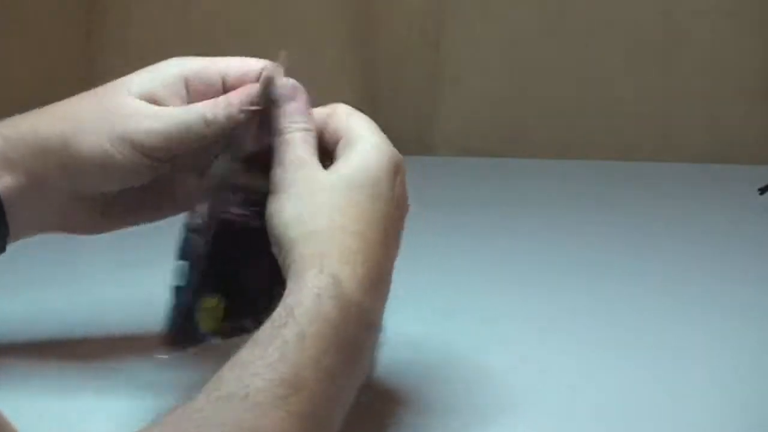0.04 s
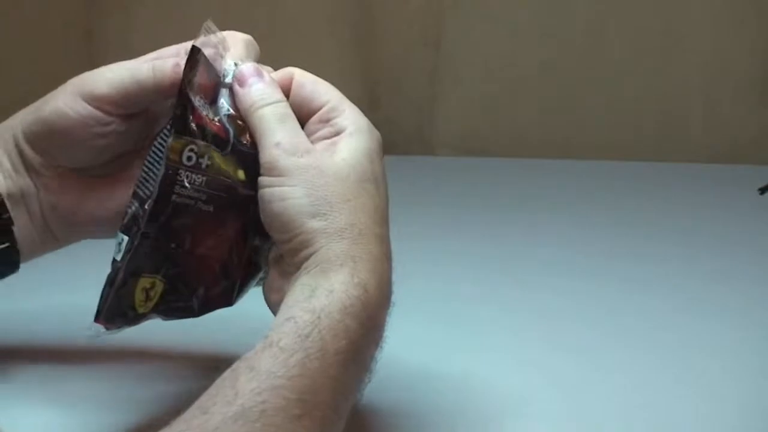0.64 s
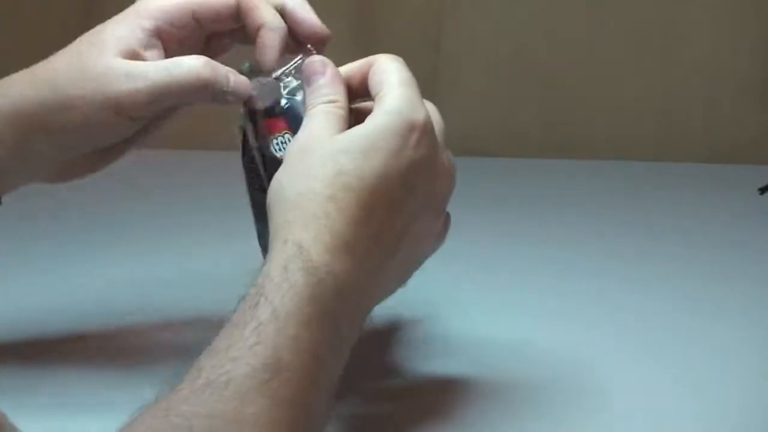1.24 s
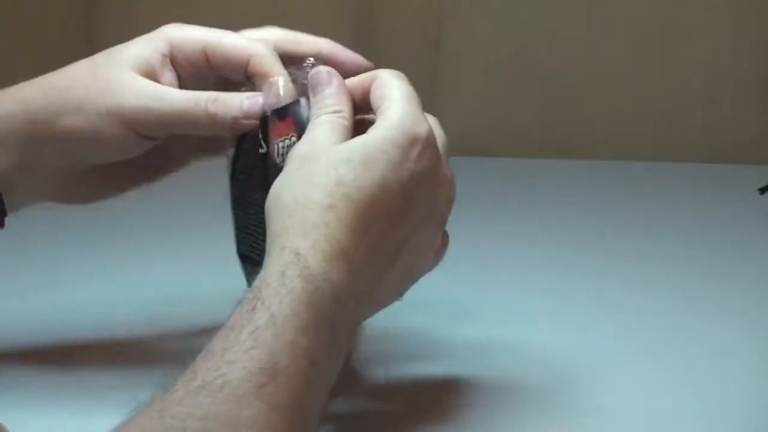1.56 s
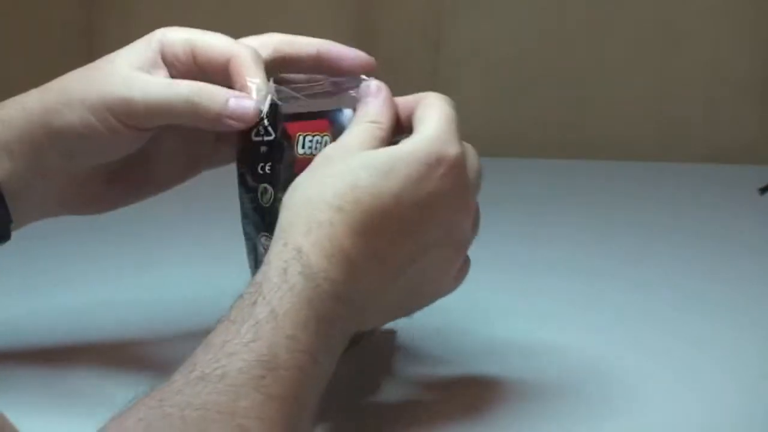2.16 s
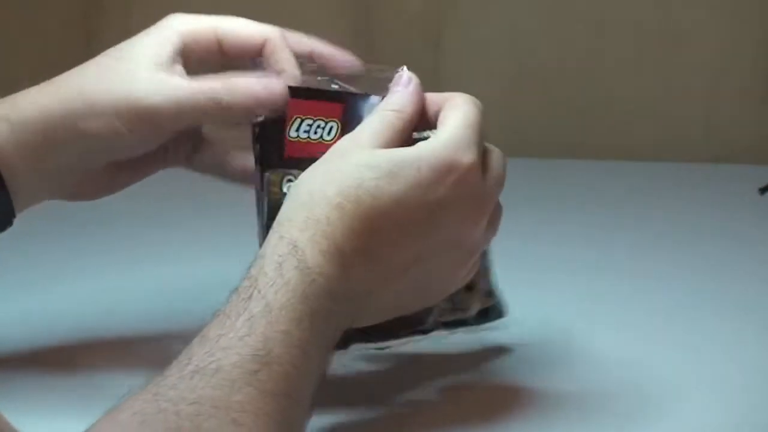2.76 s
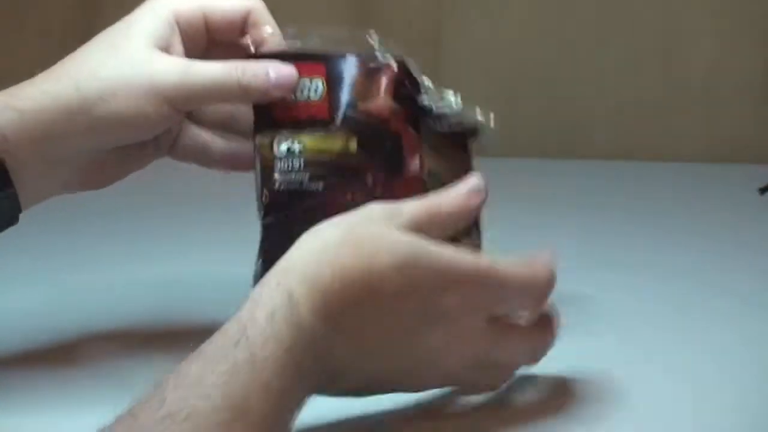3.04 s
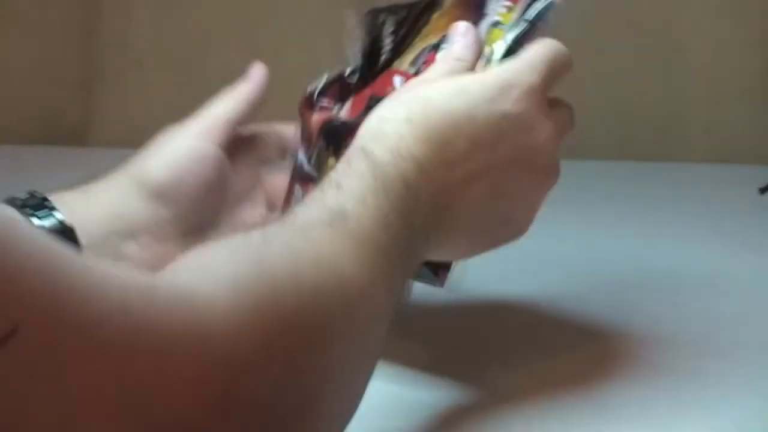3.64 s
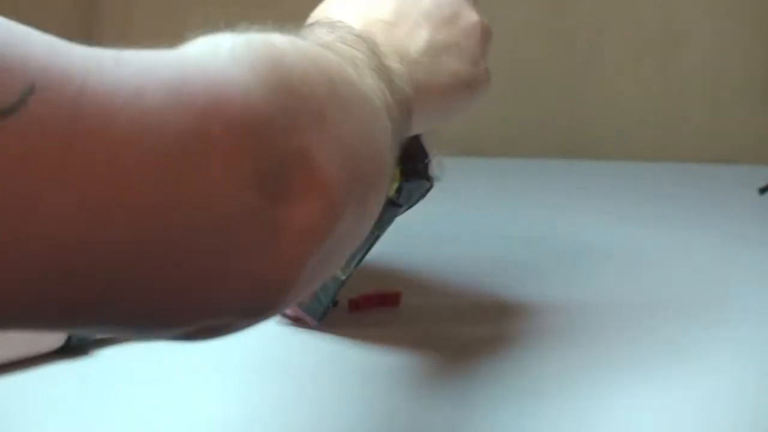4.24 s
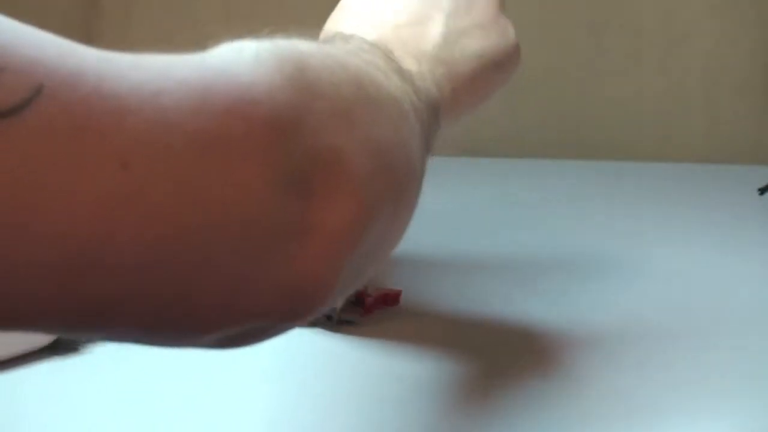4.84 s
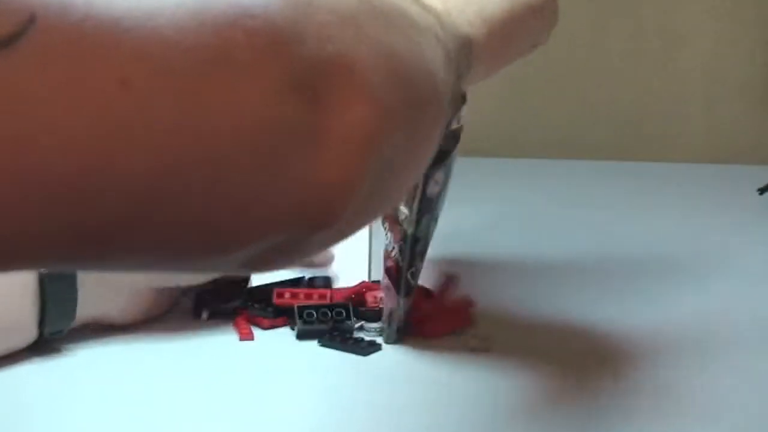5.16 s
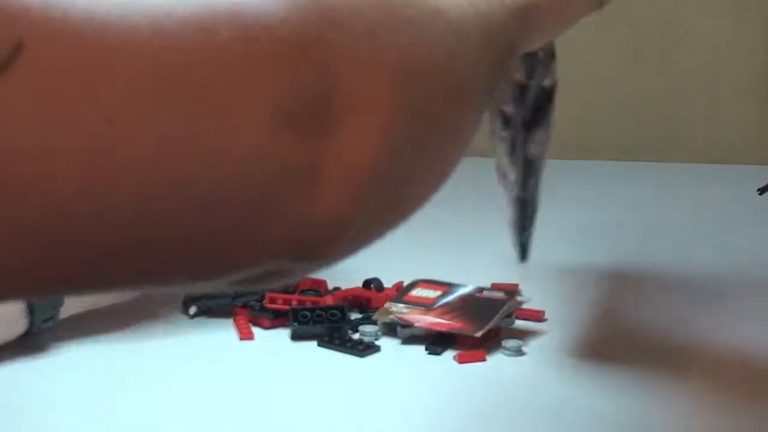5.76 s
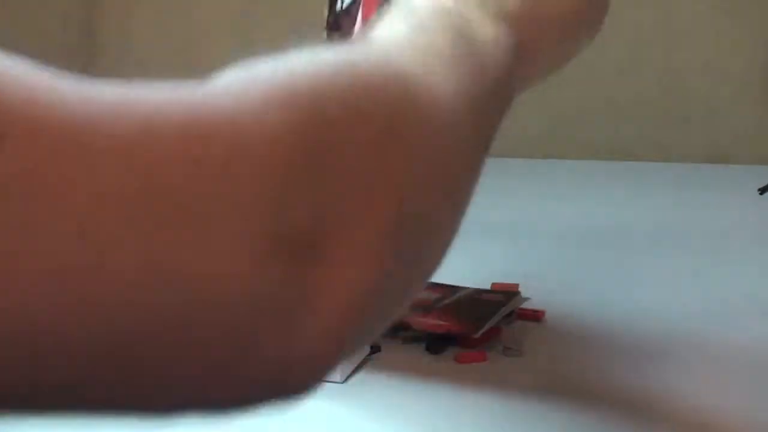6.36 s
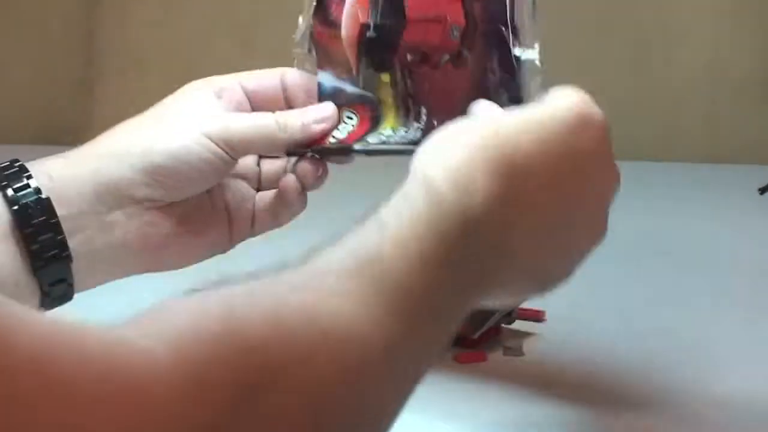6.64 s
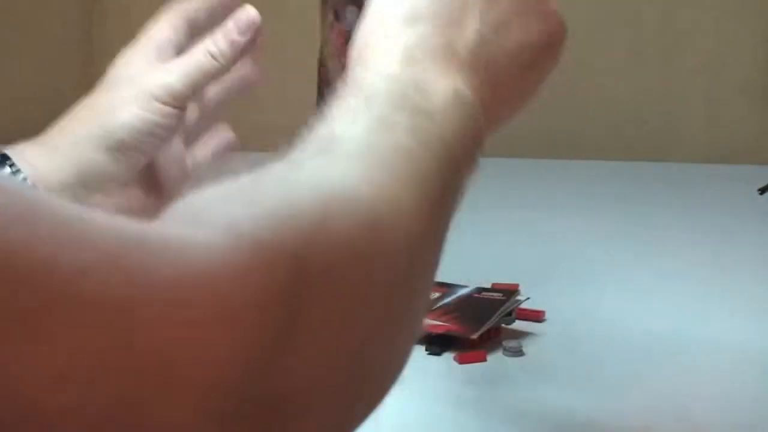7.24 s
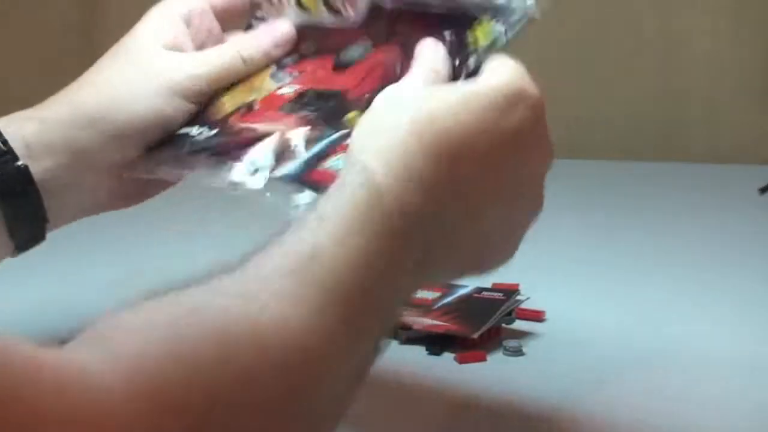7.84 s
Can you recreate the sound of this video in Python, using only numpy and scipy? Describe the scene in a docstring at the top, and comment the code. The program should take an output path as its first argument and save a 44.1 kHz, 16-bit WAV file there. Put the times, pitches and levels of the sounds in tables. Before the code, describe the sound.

Close to the microphone in a small room, fingers work open a stiff plastic packet, making sharp crackles, rustles and a few dull taps. Little plastic bricks then spill onto a tabletop in uneven surges, clacking and bouncing. A light booklet lands with a few quick slaps, and the emptied packet crinkles again in short bursts over faint room air.

```python
"""A table in a small room, with a closely spaced microphone pair near the hands.
A stiff plastic bag is torn open and crinkled; every crease that buckles is one tiny snap.
Small plastic bricks slide out and clatter on the table top, a folded booklet drops after them,
and the empty bag is shaken and crumpled. Behind it lie room air and a faint, passing hum."""
import sys
import numpy as np
from scipy import signal
from scipy.fft import rfft, irfft, next_fast_len
from scipy.io import wavfile
from scipy.ndimage import uniform_filter1d

SR = 44100
rng = np.random.default_rng(int(sys.argv[2]) if len(sys.argv) > 2 else 0)


def transcribe(u):
    """Save the signal u as a 16-bit wav file named by the first command-line argument.

    u: samples, shape (n,) or (channels, n), limited to [-1, 1]; the rate is SR.
    q: integer samples, one column per channel.
    """
    v = np.clip(np.atleast_2d(u).T, -1, 1)
    q = np.round(v * 32767).astype(np.int16)
    wavfile.write(sys.argv[1], SR, q)


N = 348831
TIME = np.arange(N) / SR

# tone colour of the plastic film: frequency_hz, level_db
FILM_COLOUR = [(50, -53), (140, -14), (280, -5.5), (430, -7.5), (620, 0.5), (1000, -2.5), (1700, 0.5),
               (2800, -0.5), (4200, 1.5), (7500, 2), (10000, -2.5), (12500, -2.5), (14500, -15.5),
               (16000, -23)]
# ringing of the table top: pitch_hz, level_db, t60_s
TABLE_TOP_MODES = [(616, -6.5, 0.34), (1435, -0.5, 0.052), (2086, 1.5, 0.15), (2216, 2, 0.15),
                   (2580, -0.5, 0.043)]
# low ringing of the whole table: pitch_hz, level_db, t60_s
TABLE_BODY_MODES = [(153, -6.5, 0.42), (289.6, -12, 0.19), (393.3, -11, 0.22)]


def bag(rustle_db=-4, snap_db=4, chain_gain_db=2, crunch_db=-11, resting_db=-58):
    """Creases buckle one by one under the fingers, in short chains, or in whole avalanches."""
    # the fingers take hold of the bag and work it: start_s, length_s, level_db
    grips = [(0, 0.089, -25.5), (.18, 0.29, -28.5), (.53, 0.12, -33.5), (.70, 0.26, -30.5),
             (.915, 0.11, -28), (1.09, 0.24, -34), (1.39, 0.34, -33), (1.8, 0.073, -44),
             (1.875, 0.32, -36.5), (2.255, 0.07, -43.5), (2.4, 0.17, -40), (2.695, 0.016, -36),
             (2.83, 0.099, -36.5), (2.925, 0.25, -28), (3.33, 0.056, -25.5), (3.525, .04, -37),
             (3.572, 0.013, -30), (3.74, 0.14, -34), (3.925, 0.16, -29.5), (5.945, .11, -43.5),
             (6.3, 0.33, -45.5), (6.6, 0.11, -30.5), (6.74, 0.22, -34), (7.27, 0.12, -38),
             (7.38, 0.076, -28), (7.54, 0.17, -33), (7.845, 0.069, -29)]
    # slack film sounds deeper: time_s, low_lift_db
    slack = [(0, 1.5), (1.9, 5.5), (2.55, 10.5), (2.72, 4), (4.0, 8), (6.3, 19.5), (6.45, 4.5)]
    # loud creases that set off a chain of smaller ones: start_s, crack_db, chain_db, chain_low_lift_db
    snaps = [(0.017, -8, -20, 0.5), (0.1297, -9, -35, 10), (0.18, -12, -38, 3), (0.21, -1.5, -22, 2),
             (0.259, -6, -19.5, 1.5), (0.414, -15, -41, -9), (0.540, -6, -20, -12), (0.841, -11, -25, -8),
             (0.876, -6, -28.5, 8), (0.956, -4, -20.5, -1), (1.0674, 1.5, -41, -12), (1.2506, -4.5, -29, 2),
             (1.319, -10.5, -30.5, 11), (1.3839, -13, -29, -13), (1.446, -12, -34, -15),
             (1.548, -15, -25, -15), (1.591, -10, -22, -16), (1.7974, -12.5, -36, 15.5),
             (1.9374, -10.5, -39, -1), (2.068, -5.5, -31, 10), (2.102, -8, -32, 10),
             (2.148, -22, -36, 16.5), (2.403, -12.5, -31, 10.5), (2.5606, -9.5, -35, 16.5),
             (2.6687, -12, -26, -23), (3.178, -8, -20.5, 5.5), (3.477, -8.5, -23.5, -17),
             (3.626, -8.5, -27.5, 0), (3.819, -16, -18, -12), (3.9126, -16, -24, -15),
             (3.945, -5, -22.5, 9.5), (6.1811, -13.5, -34.5, 13), (6.52, -10.5, -29, -12),
             (6.758, -6, -21, -14), (7.0959, -22, -26.5, -15), (7.359, -6.5, -24.5, -2),
             (7.5644, -11.5, -39.5, -14)]
    # whole folds collapsing: start_s, level_db, length_s, low_lift_db
    crunches = [(0.059, -13.5, 0.02, 3), (0.734, -9.5, 0.058, 2.5), (1.668, -16, 0.057, 4),
                (1.977, -14.5, 0.026, -24), (2.932, -17, 0.057, 3), (3.32, -8.5, 0.047, 2),
                (3.948, -15.5, 0.034, 2.5), (6.409, -16, 0.07, 2.5), (6.5772, -6.5, 0.062, -2.5),
                (6.892, -14.5, 0.047, -4.5), (7.416, -7.5, 0.06, -2), (7.687, -7, 0.051, 2.5)]
    effort = swells(grips, attack_s=0.0014, sag_db_per_s=6.5, release_db_per_s=250) + amp(resting_db)
    creases = crackle(per_s=2000, spread_db=4.9, fade_s=0.0008)
    rustle = effort * flurries(per_s=29, lift_db=11, fade_s=0.0046) * creases
    film = amp(rustle_db) * deepened(rustle, np.interp(TIME, *np.transpose(slack)))
    chain = crackle(per_s=3500, spread_db=3.8, fade_s=0.0005)
    after = np.arange(SR // 5)
    t = after / SR
    spreading = np.minimum(t / 0.0055, 1) * np.exp(-t / 0.0086)  # a chain takes a moment to get going
    for s, crack_db, chain_db, low_db in snaps:
        crack = unit(deepened(chatter(fade_s=0.00032), lift_db=-6, hz=4560))
        burst = chain.take(round(s * SR) + after, mode="wrap") * spreading
        add(film, s, amp(crack_db + snap_db) * crack)
        add(film, s, amp(chain_db + chain_gain_db) * deepened(burst, low_db))
    avalanche = crackle(per_s=7000, spread_db=2, fade_s=0.00013)
    for s, db, length_s, low_db in crunches:
        progress = t / length_s  # the fold gives way quickly, then runs out of creases
        collapse = np.minimum(progress / 0.28, 1) * np.exp(-progress ** 3)
        burst = avalanche.take(round(s * SR) + after, mode="wrap") * collapse
        add(film, s, amp(db + crunch_db) * deepened(burst, low_db))
    return through(panels(film), unit(colour(FILM_COLOUR)))


def flurries(per_s, lift_db, fade_s):
    """Gain of mean power 1 that jumps at random moments, as small creases give way together."""
    starts = rng.random(N) < per_s / SR
    extra_power = amp(lift_db) ** 2 * np.exp(-2 * TIME[:SR // 5] / fade_s)
    return evened(np.sqrt(1 + abs(through(1. * starts, extra_power))))


def panels(film, patch_db=1.2, bins=7, frames=10):
    """As the bag changes shape, its taut panels resonate at ever new pitches."""
    spectra = signal.stft(film, nperseg=256)[2]
    patches = uniform_filter1d(rng.standard_normal(spectra.shape), bins, axis=0)
    patches = evened(uniform_filter1d(patches, frames, axis=1))
    return signal.istft(spectra * evened(amp(patch_db * patches)))[1][:N]


def bricks(clatter_db=-4, rub_db=-0.5, jingle_db=-7, landing_db=9, tick_db=6, thud_db=-13.5, count=10):
    """Each contact clacks on the table, ticks, and rings a brick; bricks differ in size and landing spot."""
    # single bricks landing: start_s, level_db, tick_relative_db, rattle_s, pitch_hz
    landings = [(4.052, -20, 18, 0.029, 2680), (4.14, -7.5, 3, 0.0072, 2500), (4.187, 0, -5, 0.007, 2100),
                (4.2327, -1.5, -5, 0.011, 1470), (4.2775, -2.5, 2, 0.017, 2370),
                (4.295, -5, -3, 0.0054, 2540), (4.3144, -0.5, -5, 0.01, 2330),
                (4.512, -10, 10.5, 0.017, 1450), (4.5935, 2.5, -12, 0.003, 2350),
                (4.5985, 5, -9, .004, 2440), (4.6987, -9.5, -14, 0.0017, 2370), (4.739, -2, 0, 0.012, 2280),
                (4.797, -1.5, -4, 0.03, 2460), (4.9297, -17, 11.5, 0.00096, 2300),
                (5.011, 0, -15, 0.0096, 2210), (5.038, -1, -5, 0.0055, 2400),
                (5.0988, -2.5, -4, 0.0052, 2170), (5.132, -5, 2, 0.0059, 2160),
                (5.1786, -2, 1, 0.0076, 2280), (5.1916, -2.5, 7.5, 0.0105, 2700),
                (5.225, -4, 4, 0.0042, 2170), (5.2509, 0.5, -6, 0.0048, 2190), (5.258, -2, 2, 0.003, 2600),
                (5.3682, -14, 0, 0.0048, 2200), (5.456, -10, 10.5, 0.004, 2080),
                (5.5151, -13, 5.5, 0.0041, 2220), (5.5681, -16, 9.5, 0.0048, 2200),
                (5.589, -19, 12.5, 0.0049, 2200), (5.625, -8.5, 8.5, 0.0058, 2130),
                (5.644, -7.5, 3.5, 0.0045, 2120), (5.716, -18, 3.5, 0.0042, 2090)]
    # ringing of a brick: pitch_hz, level_db, t60_s
    brick_modes = [(4780, -3, 0.036), (6420, 8.5, 0.033), (8380, 14.5, 0.038), (11740, 12, 0.027),
                   (13300, 2, .05)]
    # tone colour of a brick striking the table: frequency_hz, level_db
    clack_colour = [(80, -49), (220, -23), (700, -16), (1750, -8), (2250, 0.5), (2600, -2.5), (3000, -6),
                    (4000, -9.5), (16000, -70)]
    # tone colour of the sharp ticks: frequency_hz, level_db
    tick_colour = [(40, -58), (150, -4.5), (1000, 4.5), (3500, 1), (6500, 3), (8500, 0), (9800, -5),
                   (12000, -4), (14500, -26), (16000, -40)]
    impact = np.zeros(len(ring(TABLE_TOP_MODES)))
    add(impact, 0, unit(colour(clack_colour)))
    sizes = np.linspace(-1, 1, count)
    clacks = [unit(impact + amp(-4) * ring(TABLE_TOP_MODES, ratio))
              for ratio in np.exp(0.0555 * sizes ** 3)]
    tinkles = [ring(brick_modes, ratio) for ratio in np.exp(0.022 * sizes + 0.025 * sizes ** 3)]
    striking, rubbing = pour()
    which = rng.integers(0, count, N)
    blows = amp(clatter_db) * striking * clicks(per_s=450, spread_db=0.5)
    jostle = amp(jingle_db) * rubbing * clicks(per_s=510, spread_db=7, size=2000)
    ticks = amp(rub_db) * rubbing * crackle(per_s=1400, spread_db=3.5, fade_s=0.00034)
    out = sum(through(blows * (which == k), clacks[k]) + through(jostle * (which == k), tinkles[k])
              for k in range(count))
    for (s, db, sharp_db, rattle_s, hz), k in zip(landings, which):
        clack = clacks[k] + amp(-2) * ring([(hz, 0, 0.025)])  # each piece adds its own short note
        add(out, s, amp(db + landing_db) * unit(through(chatter(rattle_s), clack)))
        tick = unit(deepened(chatter(rattle_s), lift_db=-32, hz=2980))
        add(ticks, s, amp(db + sharp_db + tick_db) * tick)
    shaking = striking * clicks(per_s=180, spread_db=3.5, size=1500)
    out += amp(thud_db) * through(shaking, ring(TABLE_BODY_MODES))
    out += through(ticks, unit(colour(tick_colour)))
    return signal.lfilter(*signal.butter(4, 125, "high", fs=SR), out)  # the clatter is cut below about 125 Hz


def pour():
    """Gains over time of the bricks that strike the table and of those that rub each other."""
    # the bricks leave the bag in surges: start_s, length_s, striking_db, rubbing_db
    surges = [(4.034, 0.33, -28.5, -25), (4.425, 0.15, -33, -27), (4.597, 0.38, -29.5, -29),
              (4.981, 0.31, -23.5, -25.5), (5.354, 0.19, -32, -39.5), (5.56, 0.15, -33, -39)]
    start_s, length_s, striking_db, rubbing_db = np.transpose(surges)
    return [swells(zip(start_s, length_s, db), attack_s=0.021, sag_db_per_s=9, release_db_per_s=203)
            for db in (striking_db, rubbing_db)]


def pings(ping_db=-1, attack_s=0.0017, t60_cycles=800, pair_ratio=1.02, pair_db=-5, size=12000):
    """A bouncing brick rings unevenly with a close pair of wall modes; low pitches ring longest."""
    # bricks that bounce free and ring out: start_s, pitch_hz, level_db
    bounces = [(4.061, 7580, -23), (4.072, 11025, -27), (4.078, 12920, -31), (4.13, 10680, -36),
               (4.197, 10980, -23), (4.3, 8484, -19), (4.336, 11326, -37), (4.519, 11540, -30),
               (4.574, 10766, -36), (4.673, 8570, -41), (4.737, 8700, -23), (4.794, 12850, -28),
               (4.801, 8613, -21), (4.847, 11400, -21), (4.922, 7700, -25), (5.03, 11250, -27),
               (5.068, 8484, -23), (5.097, 6244, -22.5), (5.112, 8397, -22), (5.131, 11750, -25),
               (5.169, 8053, -22), (5.171, 13436, -27), (5.186, 11929, -16), (5.298, 4737, -30),
               (5.3675, 8139, -26.5), (6.374, 6775, -31), (6.379, 8500, -29), (6.705, 2370, -39),
               (6.936, 2390, -38.5)]
    out, t = np.zeros(N), TIME[:size]
    for (s, hz, db), phase in zip(bounces, rng.random(len(bounces))):
        envelope = np.minimum(t / attack_s, 1) * amp(-60 * t * hz / t60_cycles)
        pair = np.sin(2 * np.pi * hz * t) + amp(pair_db) * np.sin(2 * np.pi * (hz * pair_ratio * t + phase))
        jostled = 1 + 0.45 * evened(lows(rng.standard_normal(size), hz=160))
        add(out, s, amp(db + ping_db) * envelope * jostled * pair)
    return out


def knocks(knock_db=14):
    """A light, stiff sheet slaps, flutters for a few milliseconds and rings hollow; the table rings along."""
    # the booklet lands, stiff panels flip: start_s, ring_db, flutter_s, slap_relative_db, table_relative_db
    hits = [(3.851, -15.5, 0.0011, 0, -8), (5.976, -14.5, 0.0049, -1, -19), (6.0, -9, .003, -3, -3.5),
            (6.048, -12, 0.0021, -0.5, -4), (6.318, -41, 0.0031, 7, -12), (6.701, -10, 0.0052, 0, -12),
            (6.814, -14, 0.0064, -17, -13)]
    # hollow ringing of the sheet: pitch_hz, level_db, t60_s
    sheet_modes = [(1160, 7.5, 0.025), (1463, 9.5, 0.026)]
    # tone colour of the slap: frequency_hz, level_db
    slap_colour = [(50, -35), (250, -2), (600, -3.5), (1200, -4), (1800, 7), (2800, 4), (3500, -5.5),
                   (8000, -8.5), (16000, -36)]
    out = np.zeros(N)
    sheet, slap, table = ring(sheet_modes), colour(slap_colour), ring(TABLE_TOP_MODES)
    for s, db, flutter_s, slap_db, table_db in hits:
        for part_db, body in (0, sheet), (slap_db, slap), (table_db, table):
            add(out, s, amp(db + part_db + knock_db) * unit(through(chatter(flutter_s), body)))
    return out


def shifts(slap_db=-3, rattle_s=0.0037):
    """Bricks knock together inside the bag, damped by the film, and slap against it."""
    # bricks shifting in the bag: start_s, level_db, pitch_hz
    contacts = [(0.187, -1.5, 1910), (0.414, -11, 1810), (0.447, -19, 2440), (0.64, -7, 1810),
                (1.104, -21, 2550), (1.295, -10, 1980), (2.211, -14, 1730), (2.257, -13, 1850),
                (2.434, -12.5, 2090), (2.522, -11.5, 1900), (2.856, -9, 2580), (3.301, -12.5, 1930),
                (3.698, -8.5, 2800), (3.761, -11, 2400)]
    # ringing of a brick held in the film: pitch_ratio, level_db, t60_s
    damped_modes = [(1, 4.5, 0.015), (1.38, 4, 0.0084), (3.1, -10, 0.028)]
    out = np.zeros(N)
    for s, db, hz in contacts:
        clack = unit(through(chatter(rattle_s), ring(damped_modes, hz)))
        slap = through(chatter(rattle_s), colour(FILM_COLOUR))
        slap = unit(deepened(slap, lift_db=7.5, hz=905))
        add(out, s, amp(db) * (clack + amp(slap_db) * slap))
    return out


def taps(slap_db=-2, t60_s=0.019):
    """A fingertip gives the bag a dull push, and the stretched film rings like a small, dead drum."""
    # fingertips on the taut bag: start_s, level_db, pitch_hz
    touches = [(1.321, -8, 495), (2.069, -12.5, 576), (2.084, -11, 318), (2.104, -12.5, 420),
               (2.305, -19.5, 740), (2.435, -17.5, 730), (2.52, -13.5, 615), (2.561, -12, 300)]
    out = np.zeros(N)
    for s, db, hz in touches:
        slap = unit(lows(through(chatter(fade_s=0.0024), colour(FILM_COLOUR)), 2 * hz))
        add(out, s, amp(db) * ring([(hz, 0, t60_s)]))
        add(out, s, amp(db + slap_db) * slap)
    return out


def bumps(attack_s=0.0058, bump_db=3):
    """Soft, slow pushes reach only the lowest mode of the table and set it humming."""
    # a wrist or the booklet bumps the table: start_s, level_db
    pushes = [(3.77, -17.5), (5.991, -20), (6.241, -22)]
    out, hum = np.zeros(N), ring(TABLE_BODY_MODES[:1])
    thud = unit(hum * np.minimum(TIME[:len(hum)] / attack_s, 1))
    for s, db in pushes:
        add(out, s, amp(db + bump_db) * thud)
    return out


def room(dry, count=7, size=300):
    """Sounds come from ever new spots on the bag and table, each with its own reflections."""
    spot = np.repeat(rng.integers(0, count, N // size + 1), size)[:N]
    shares = (np.sqrt(abs(uniform_filter1d(1. * (spot == k), size))) for k in range(count))
    wet = sum(through(dry * share, reflections()) for share in shares)
    return signal.sosfilt(signal.butter(4, 110, "high", fs=SR, output="sos"), wet)  # the reflections are cut below about 110 Hz


def reflections(tail_db=-6, early_db=-4.5, early_fade_s=0.0058, wall_db=-8.5, wall_s=0.0076, size=20000):
    """Quick scatter from the table and hands, one echo off the back wall, then the room's tail."""
    # decay of the small room: frequency_hz, t60_s
    room_decay = [(150, 0.17), (600, 0.32), (2200, 0.28), (6000, 0.25), (14000, 0.21)]
    hz, t, spectra = signal.stft(rng.standard_normal(size), SR, nperseg=256)
    tail = signal.istft(spectra * amp(-60 * t / read(room_decay, hz)[:, None]), SR)[1][:size]
    early = rng.standard_normal(size) * np.exp(-TIME[:size] / early_fade_s)
    onset = np.minimum(TIME[:size] / 0.0025, 1) ** 2
    out = amp(tail_db) * unit(tail * onset) + amp(early_db) * unit(early * onset)
    add(out, wall_s * rng.uniform(0.85, 1.15), amp(wall_db) * chatter(fade_s=0.00064))
    return out


def background(air_db=-55, hum_hz=80, beat_hz=13, partner_db=-3, waver_hz=2.5):
    """Steady room air with a faint whir, and a low hum of two close tones that throb."""
    # tone colour of the room air: frequency_hz, level_db
    air_colour = [(25, -8), (60, -7), (100, 1.5), (170, -5.5), (400, -3), (900, -3.5), (2200, -12),
                  (10000, -35), (16000, -47)]
    # the hum swells for a while: time_s, level_db
    hum_swell = [(1.6, -69), (2.3, -58.5), (3.2, -59), (3.8, -67)]
    air = evened(through(rng.standard_normal(N), colour(air_colour)))
    drift = evened(lows(rng.standard_normal(N), hz=1.97))
    turns = np.cumsum(hum_hz + waver_hz * drift) / SR
    hum = np.sin(2 * np.pi * turns) + amp(partner_db) * np.sin(2 * np.pi * (turns - beat_hz * TIME))
    hum_db = np.interp(TIME, *np.transpose(hum_swell))
    return amp(air_db) * air + amp(hum_db) * evened(hum)


def crackle(per_s, spread_db, fade_s, count=200):
    """A stream of cracks at random moments, rms near 1."""
    train = clicks(per_s, spread_db)
    bank = cracks(fade_s, count)
    pick = rng.integers(0, count, N)
    starts = np.flatnonzero(train)
    places = starts[:, None] + np.arange(bank.shape[1])
    sounds = train[starts, None] * bank[pick[starts]]
    return np.bincount(places.ravel(), sounds.ravel(), N)[:N]


def cracks(fade_s, count, facet_db=-4, low_hz=2200, high_hz=11000, cycles=1.53, size=160):
    """Very short bursts; each also flicks one small facet, which rings for a few cycles at its own pitch."""
    t = TIME[:size]
    fades_s = fade_s * np.exp(0.5 * rng.standard_normal((count, 1)))
    burst = unit(rng.standard_normal((count, size)) * np.exp(-t / fades_s))
    hz = low_hz * (high_hz / low_hz) ** rng.random((count, 1))
    facet = unit(np.sin(2 * np.pi * hz * t) * np.exp(-t * hz / cycles))
    return unit(burst + amp(facet_db) * facet)


def clicks(per_s, spread_db, size=900):
    """Random clicks, many small and a few large, of even power in the long run."""
    strength = amp(spread_db * np.minimum(rng.exponential(1, N), 4))
    train = strength * (rng.random(N) < per_s / SR)
    power = uniform_filter1d(uniform_filter1d(train ** 2, size), size)
    return train * rng.choice([-1, 1], N) / np.sqrt(abs(power) + 1e-6)


def chatter(fade_s, size=4096, passes=6):
    """A light thing lands and rattles: a dying run of tiny contacts that favours no pitch, energy 1."""
    envelope = np.exp(-TIME[:size] / fade_s)
    burst = rng.standard_normal(size) * envelope
    for _ in range(passes):  # impose the decay, then flatten the spectrum
        burst = burst * envelope / np.sqrt(abs(uniform_filter1d(burst ** 2, size=100)) + 1e-20)
        burst = irfft(np.exp(1j * np.angle(rfft(burst))))
    return np.pad(unit(burst[:size // 2]), (0, size))


def ring(modes, tuning=1, size=8000):
    """Dying modes after one blow, their pitches multiplied by tuning, energy 1."""
    t = TIME[:size]
    return unit(sum(amp(db - 60 * t / t60) * np.cos(2 * np.pi * hz * tuning * t) for hz, db, t60 in modes))


def swells(moves, attack_s, sag_db_per_s, release_db_per_s):
    """Gain over time of moves that each rise, sag while they last, and die away."""
    power, t = np.zeros(N), TIME[:SR]
    for s, length_s, db in moves:
        fall_db = sag_db_per_s * t + release_db_per_s * np.maximum(t - length_s, 0)
        add(power, s, (np.minimum(t / attack_s, 1) * amp(db - fall_db)) ** 2)
    return np.sqrt(power)


def colour(points, size=4096):
    """Causal impulse response with the given spectrum."""
    log_gain = np.log(amp(read(points, abs(np.fft.fftfreq(size, 1 / SR)))))
    return np.fft.ifft(np.exp(np.conj(signal.hilbert(log_gain)))).real[:size // 2]


def read(points, hz):
    """A table's value at hz, interpolated over log frequency."""
    points_hz, values = np.transpose(points)
    return np.interp(np.log(hz + 1), np.log(points_hz), values)


def deepened(x, lift_db, hz=1800):
    """Lifts or lowers the lows of x."""
    return x + (amp(lift_db) - 1) * lows(x, hz)


def lows(x, hz):
    """Gentle low-pass at hz."""
    return signal.lfilter(*signal.butter(1, hz, fs=SR), x)


def through(x, response):
    """Convolution, cut to the length of x."""
    return signal.oaconvolve(x, response)[:len(x)]


def add(mix, s, sound):
    """Mixes a sound in at s seconds."""
    part = mix[max(round(s * SR), 0):][:len(sound)]
    part += sound[:len(part)]


def amp(db):
    """Decibels to gain."""
    return 10 ** (np.asarray(db) / 20)


def evened(x):
    """Scaled to rms 1."""
    return x / np.sqrt(np.mean(x ** 2) + 1e-20)


def unit(x):
    """Scaled to energy 1 along the last axis."""
    return x / (np.linalg.norm(x, axis=-1, keepdims=True) + 1e-20)


def scene(direct_db=-1.5):
    """All sources reach a closely spaced microphone pair, directly and by way of the room."""
    # stereo width of the pair: frequency_hz, side_gain_db
    width = [(100, -16), (450, -8.5), (1200, -12), (5000, -20.5), (7200, -17.5), (8800, -9), (10500, 0),
             (14000, -35)]
    # balance of the pair: frequency_hz, left_minus_right_db
    balance = [(100, -0.3), (600, 1.3), (8000, -0.22)]
    direct = amp(direct_db) * (bag() + taps() + shifts() + bricks() + pings() + knocks() + bumps())
    mid = direct + room(direct) + background()
    # the two microphones hear the direct sound with different phase, and different reflections
    phase_shifted = signal.hilbert(direct, next_fast_len(N)).imag[:N]
    side = through(0.076 * phase_shifted + room(direct, count=2) + background(), colour(width))
    left = through(mid + side, colour([(hz, db / 2) for hz, db in balance]))
    right = through(mid - side, colour([(hz, -db / 2) for hz, db in balance]))
    return np.array([left, right])


def record(dry):
    """The recorder overloads softly near full scale, then cuts the highest treble."""
    ceiling, edge_hz = 0.9, 16150
    limited = ceiling * np.tanh(dry / ceiling)
    low_pass = signal.firwin(511, edge_hz, window=("kaiser", 9), fs=SR)
    return signal.oaconvolve(limited, low_pass[None], "same", axes=1)


dry = scene()
out = record(dry)
transcribe(out)
```